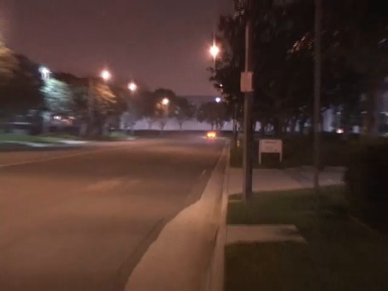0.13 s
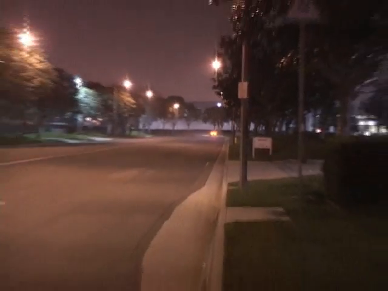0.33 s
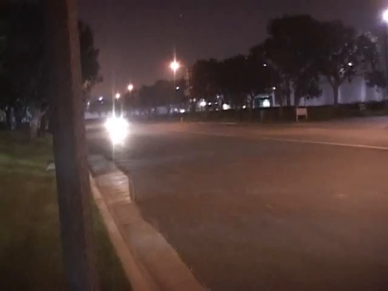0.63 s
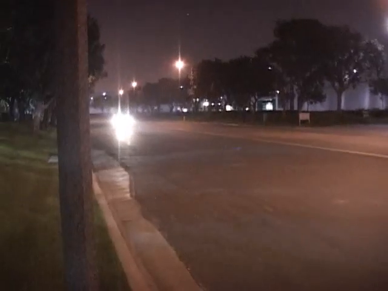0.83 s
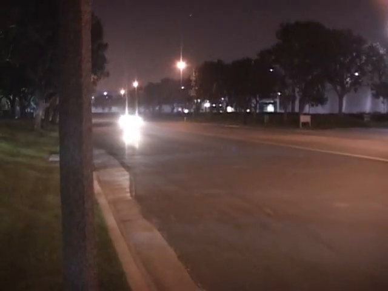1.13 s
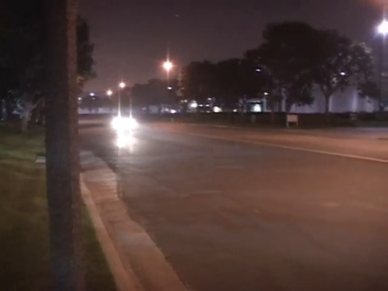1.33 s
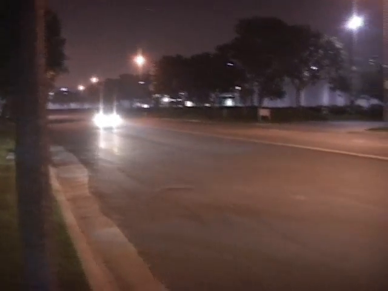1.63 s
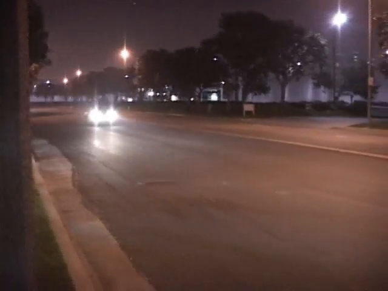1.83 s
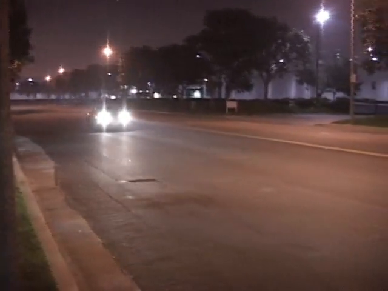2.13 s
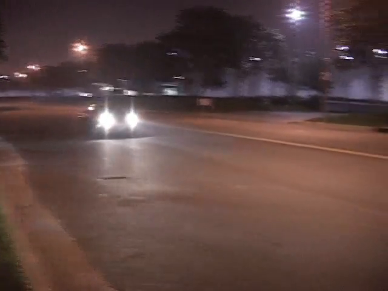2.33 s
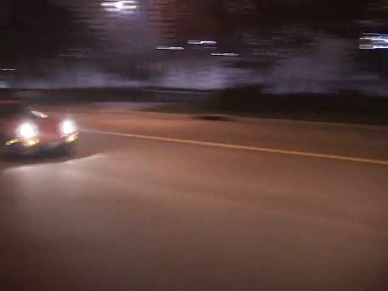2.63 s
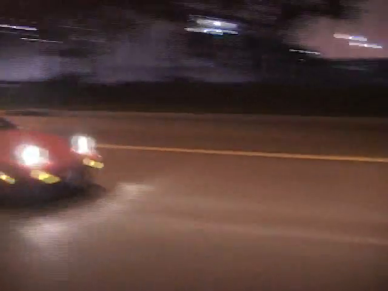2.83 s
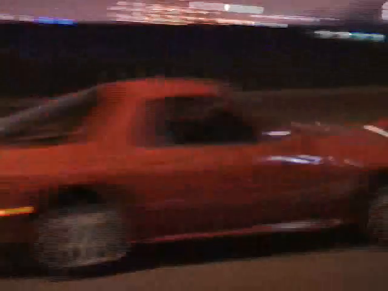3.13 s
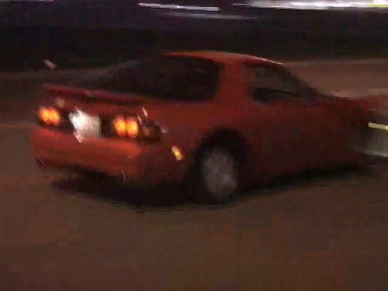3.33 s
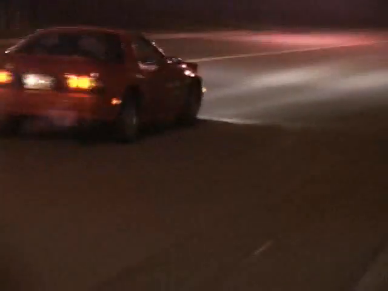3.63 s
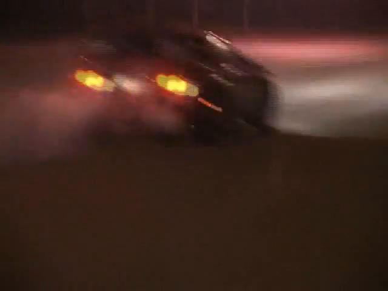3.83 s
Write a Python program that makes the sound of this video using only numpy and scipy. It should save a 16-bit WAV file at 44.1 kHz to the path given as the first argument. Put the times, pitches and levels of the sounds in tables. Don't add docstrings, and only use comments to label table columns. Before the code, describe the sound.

After a faint distant tyre rush, an abrupt cut brings a buzzing car engine swelling nearer; it coasts past close by in bright hiss, its exhaust banging and popping, distorting the small camera microphone, with street echo.

```python
import sys
import numpy as np
from scipy import signal
from scipy.fft import rfft, irfft, next_fast_len
from scipy.io import wavfile
from scipy.ndimage import uniform_filter1d, map_coordinates

SR = 44100
rng = np.random.default_rng(int(sys.argv[2]) if len(sys.argv) > 2 else 0)


def int16_out(signal):
    q = np.round(np.clip(np.atleast_2d(signal).T, -1, 1) * 32767)
    wavfile.write(sys.argv[1], SR, q.astype(np.int16))


def ratio(d):
    e = np.asarray(d, float) / 20
    return 10 ** e


N = 176400
T = np.arange(N) / SR
CUT_S, LIFT_S = 0.594, 2.575


def unit(x):
    return x / np.sqrt(np.mean(x ** 2) + 1e-20)


def along(points, hz):
    f, v = np.transpose(points)
    return np.interp(np.log(hz + 1), np.log(f + 1), v)


def curves(rows):
    s, *cols = np.transpose(rows)
    return [np.interp(T, s, c) for c in cols]


def ramp(from_s, to_s):
    return np.clip((T - from_s) / (to_s - from_s), 0, 1)


def fade_between(from_s, to_s, fade_s):
    return ramp(from_s - fade_s, from_s + fade_s) * (1 - ramp(to_s - fade_s, to_s + fade_s))


def wobble(rate):
    coarse = np.arange(0, N + 64, 64)
    knots = rng.standard_normal(int(N * rate / SR) + 4)
    return np.interp(np.arange(N), coarse, map_coordinates(knots, [coarse * rate / SR]))


def filtered(x, response):
    m = next_fast_len(N + SR // 2)
    return irfft(rfft(x, m) * response(np.fft.rfftfreq(m, 1 / SR)), m)[:N]


def equalised(x, points):
    return filtered(x, lambda hz: ratio(along(points, hz)))


def coloured(spectrum):
    return unit(equalised(rng.standard_normal(N), spectrum))


def above(x, cut_hz):
    return signal.sosfilt(signal.butter(3, cut_hz, "high", fs=SR, output="sos"), x)


# hz, level_db (per Hz)
DISTANT_RUSH = [(24, -60), (40, -26.5), (204, -4.5), (234, -15), (268, -10), (386, -11), (955, 3.5),
                (3640, -25), (9000, -42), (11700, -61), (19800, -120)]
# start_s, level_db
BUMPS = [
    (0.133, -49),
    (.163, -41),
]


def distant_car():
    drone_hz = 241 + 2.0 * wobble(5.1)
    drone = ratio(-53 + 1.5 + 0.87 * wobble(10.0)) * np.sin(2 * np.pi * np.cumsum(drone_hz) / SR)
    bumps = sum(ratio(db - 60 * np.clip(T - s, 0, 1) / 0.029) * (T > s) for s, db in BUMPS)
    return (ratio(-41 + 0.6 * wobble(24.5)) + bumps) * coloured(DISTANT_RUSH) + drone


# hz, level_db (per Hz)
HAND_RUMBLE = [(15, -10), (30, 0), (60, -6), (100, -20), (200, -60)]


def handling():
    settle_s = 1.4
    holding = 1 - ramp(settle_s - 0.2, settle_s + 0.2)
    return ratio(-67 + 2.5 * wobble(9)) * holding * coloured(HAND_RUMBLE)


# time_s, note_db, rasp_db
THROTTLE_LEVELS = [
    (.62, -24, -52),
    (.8, -23.5, -50),
    (1.2, -21, -44),
    (1.57, -19, -37.5),
    (2.0, -16, -35.5),
    (2.1, -14, -32.5),
    (2.25, -13, -32.5),
    (2.5, -7.5, -33),
    (2.56, -10.5, -28.5),
]
# order, level_db
ORDERS_FAR = [(1, -31), (2, -2), (3, -18.5), (4, -10), (5, -15.5), (6, -17), (7, -22), (8, -17), (9, -13.5),
              (10, -5.5), (11, -17), (12, -18.5), (13, -32), (14, -39)]
ORDERS_HALFWAY = [(1, -33), (2, -3.5), (3, -23), (4, -18.5), (5, -10.5), (6, -22), (7, -11), (8, -11),
                  (9, -11.5), (10, -7), (11, -16), (12, -16), (13, -42), (14, -44)]
ORDERS_CLOSE = [(1, -28.5), (2, -2), (3, -34), (4, -13), (5, -10), (6, -12), (7, -34), (8, -14.5), (9, -18),
                (10, -17.5), (11, -32), (12, -34), (13, -32), (14, -24.5)]
# order, level_db
ORDERS_COASTING = [(1, -4.5), (2, -3.5), (3, -2.5), (4, 2), (5, -6.5), (6, -5), (8, -3), (9, -4.5),
                   (10, -15)]
# hz, level_db
RASP_FAR = [(1700, -11), (2250, 8.5), (2600, -7), (2900, 9), (3400, -5), (4050, 6), (4600, 0), (6500, -5)]
RASP_CLOSE = [(1700, 14), (2100, 11.5), (2600, 6), (2850, 7), (3300, -10), (4050, -5), (5000, -17),
              (6500, -27)]
# order, start_s, end_s, level_db
SINGING_ORDERS = [(18, 1.15, 1.47, -42), (18, 1.8, 1.95, -33), (16, 2.05, 2.26, -36), (22, 2.1, 2.35, -36),
                  (14, 2.02, 2.23, -31), (32, 1.5, 2, -47), (33, 1.5, 1.5, -49), (30, 1.55, 1.56, -55),
                  (22, 1.55, 1.83, -43), (27, 2.4, 2.58, -34), (31, 1.7, 2.08, -43)]


def order_tone(turns, order, level_db):
    phase = order * turns - 1 / 4 + 0.45 * (rng.random() - 0.5)
    return np.sqrt(2) * ratio(level_db) * np.sin(2 * np.pi * phase)


def flutter(order):
    return 0.5 * np.sqrt(order / 4) * wobble(24.99)


def pulling_note(turns):
    nearer, near = ramp(0.85, 1.54), ramp(1.54, 2.22)
    total = 0
    for (k, far), (_, mid), (_, close) in zip(ORDERS_FAR, ORDERS_HALFWAY, ORDERS_CLOSE):
        level_db = far + nearer * (mid - far) + near * (close - mid)
        total = total + order_tone(turns, k, level_db + flutter(k))
    return total


def exhaust_rasp(turns, shaft_hz):
    knots = T[::64]
    turned = ramp(2.01, 2.07)[::64]
    knots_hz = np.interp(knots, T, shaft_hz)
    total = 0
    for k in range(15, 50):
        hz = k * knots_hz
        colour_db = np.interp(T, knots, (1 - turned) * along(RASP_FAR, hz) + turned * along(RASP_CLOSE, hz))
        fading_db = 3 * wobble(2.5) + 2.5 * wobble(25.1)
        odd_db = -4 * (k % 2)
        total = total + order_tone(turns, k, colour_db + fading_db + odd_db)
    return total


def singing_orders(turns):
    return sum(order_tone(turns, round(k), db - 1.5 + 3.3 * wobble(21.8)) * fade_between(a, b, 0.09)
               for k, a, b, db in SINGING_ORDERS)


def coasting_note(turns):
    shadow_db = -2 * (1 - ramp(3.2, 3.3))
    return sum(order_tone(turns, k, db + (k > 1) * shadow_db + 4.0 * flutter(k) + 1.4 * wobble(9))
               for k, db in ORDERS_COASTING)


def lingering_order(turns, shaft_hz):
    since = np.clip(T - LIFT_S, 0, None)
    level = ratio(-10.5 - 60 * since / 0.38) * ramp(LIFT_S - 0.03, LIFT_S)
    sag_turns = np.cumsum(0.85 * since * shaft_hz) / SR
    return level * np.sin(2 * np.pi * 5 * (turns - sag_turns))


def engine_note(turns, shaft_hz):
    throttle = ratio(-20 * np.clip(T - LIFT_S, 0, 1) / 0.015)
    note_db, rasp_db = curves(THROTTLE_LEVELS)
    coast_db = curves(ROAR_LEVELS)[2]
    pulling = ratio(note_db) * pulling_note(turns) + ratio(rasp_db - 13.5) * exhaust_rasp(turns, shaft_hz)
    driven = throttle * (singing_orders(turns) + pulling)
    coasting = ratio(coast_db) * (1 - throttle) * coasting_note(turns)
    return lingering_order(turns, shaft_hz) + driven + coasting


# time_s, roar_db, tilt_db_per_octave, coast_db
ROAR_LEVELS = [(.62, -29, -0.5, -34), (.77, -28, 0, -34), (1.36, -24, 1, -32), (2.03, -19.5, 0.5, -23),
               (2.2, -18, 0.5, -24), (2.45, -16, 1, -26), (2.65, -14, 0, -33.5), (2.85, -12, 0, -31),
               (3.05, -9.5, 0.5, -26), (3.25, -12, 2.5, -23), (3.4, -13, 1.5, -26.5), (3.6, -16, 0.5, -30),
               (3.79, -19, 1.5, -30.5), (4, -19, -2, -40.5)]
# hz, level_db (per Hz)
ROAR_SPECTRUM = [(50, -64), (110, -33), (200, -10), (400, -4), (650, -6), (1050, 0), (2200, -11.5),
                 (15500, -39.5)]
# hz, level_db
TAILPIPE_COLOUR = [(150, 1.5), (300, 0.5), (500, 1.5), (750, -0.5), (1100, 0.5), (1500, -2.5), (2000, 0),
                   (3000, 0.5)]


def roar(turns):
    level_db, tilt_db, _ = curves(ROAR_LEVELS)
    puffs = 1 + 0.1 * np.cos(4 * np.pi * turns) + 0.056 * np.cos(2 * np.pi * turns)
    hz, t, z = signal.stft(above(coloured(ROAR_SPECTRUM) * puffs, 68), SR, nperseg=512)
    patches = uniform_filter1d(rng.standard_normal(z.shape), 6, 0)
    patches = unit(uniform_filter1d(patches, 8, 1))
    tilt = tilt_db[np.minimum((t * SR).astype(int), N - 1)] * np.log2((hz[:, None] + 60) / 1200)
    facing = np.clip((t - 2.9) / (3.05 - 2.9), 0, 1)
    tilt = tilt + facing * along(TAILPIPE_COLOUR, hz)[:, None]
    shaped = signal.istft(z * ratio(tilt + 0.61 * patches), SR, nperseg=512)[1][:N]
    return ratio(level_db + 0.5 * wobble(9.24)) * shaped


# hz, level_db (per Hz)
HISS_SPECTRUM = [(1500, -30), (3000, -17), (4500, 6), (7000, -2.5), (15000, -15)]


def tyre_hiss():
    pass_s, width_s = 3.2, 0.23
    away = (T - pass_s) / width_s
    return ratio(-24 + 1.8 * wobble(29.69)) / (1 + away ** 2) * ramp(CUT_S, pass_s) * coloured(HISS_SPECTRUM)


# time_s, pitch_hz, level_db
WHISTLE = [
    (2.9, 13700, -66),
    (3.0, 13300, -36),
    (3.25, 12300, -31),
    (3.4, 12080, -62),
]


def whine():
    hz, db = curves(WHISTLE)
    silent = db <= min(WHISTLE[0][2], WHISTLE[-1][2])
    level = ratio(db + 1.3 * wobble(20) - 60 * silent)
    return level * np.sin(2 * np.pi * np.cumsum(hz + 65 * wobble(300)) / SR)


# start_s, ring_db, crack_db, push_db, length_s
BURNS = [(3.022, 1, -19, -40, 0.0026), (3.044, 4, -11, -36, 0.0036), (3.05, 4, -19, -35, 0.0037),
         (3.064, -14, -7, -40, 0.0052), (3.3109, 0.5, -4, -12, 0.0039), (3.3122, 3.5, 8.5, 4, 0.016),
         (3.4, -13, -27, -40, 0.0047), (3.435, -15, -15, -40, 0.0071), (3.517, -9.5, -36, -40, 0.007),
         (3.53, -10, -28, -40, .002), (3.5535, -13, -28, -31, 0.0011), (3.558, -2, 4.5, 2, .011),
         (3.5766, -1, -20, -12, 0.0031), (3.648, -17, -20, -40, .002), (3.703, -12.5, -18, -40, .001),
         (3.7611, -0.5, -11, -26, .001), (3.7681, 0.5, -19.5, -32, 0.0045), (3.7707, -1.5, -23, -22, .004),
         (3.7773, -4, -30, -30, .002), (3.978, -0.5, -11.5, -30, 0.0012), (3.985, 2, -22, -36, 0.0032),
         (3.9878, -1.5, -20, -30, 0.0024), (3.9944, -2.5, -22, -28, .002)]
# hz, width_hz, level_db
PIPE_RESONANCES = [(313, 200, -1), (492, 150, 7.5), (685, 130, 3.5), (1110, 1070, -3.5)]
# hz, level_db, t60_s
THUMP_MODES = [(461, -10.5, 0.051), (543.1, 0, 0.019), (334, -9.5, 0.024), (654, -10, 0.012),
               (1105, -12, 0.042)]
# hz, level_db (per Hz)
CRACK_SPECTRUM = [(500, 6), (2000, 4.5), (5000, -2.5), (15000, -16)]
# hz, level_db
STREET_COLOUR = [(300, 1.5), (1100, 0), (1600, -3), (8000, 0)]


def pipe_response(hz):
    return sum((-1) ** k * ratio(db) * 1j * hz * w / (c * c - hz * hz + 1j * hz * w)
               for k, (c, w, db) in enumerate(PIPE_RESONANCES))


def burn(since, hold, t60):
    return np.clip(since / 0.0029, 0, 1) * ratio(-60 * np.clip(since - hold, 0, 1) / t60)


def street_echo(bangs):
    t = np.arange(SR // 2) / SR
    tail = rng.standard_normal(len(t)) * ratio(-60 * t / 0.3) * (t > 0.01)
    return ratio(-15) * signal.fftconvolve(equalised(bangs, STREET_COLOUR), tail / np.linalg.norm(tail))[:N]


def backfire():
    u = np.arange(SR // 4) / SR
    late = 0.0041
    rattle = np.pad(unit(filtered(rng.standard_normal(N), pipe_response)), (0, SR))
    crack = np.pad(coloured(CRACK_SPECTRUM), (0, SR))
    thump = -sum(ratio(db - 60 * u / t60) * np.sin(2 * np.pi * hz * u) for hz, db, t60 in THUMP_MODES)
    bangs, push = np.zeros(N + SR), np.zeros(N + SR)
    for s, ring_db, crack_db, push_db, hold in BURNS:
        at = slice(round(s * SR), round(s * SR) + len(u))
        rough = ratio(-7) * min(hold / 0.012, 1) * burn(u - 0.002, hold, 0.065) * rattle[at]
        bangs[at] += ratio(ring_db) * (thump + rough)
        bangs[at] += ratio(crack_db) * burn(u - late, 0.69 * hold, 0.038) * crack[at]
        w = np.clip(u - late, 0, 1) / (0.57 * hold + 0.0018)
        push[at] -= ratio(push_db) * w * w * np.exp(2 - 2 * w)
    bangs = above(bangs[:N], 167)
    return bangs + push[:N] + street_echo(bangs)


# start_s, end_s, pitch_hz, level_db
PIPE_HOOTS = [(3.39, 3.425, 450, -22), (3.51, 3.525, 464, -15.5), (3.655, 3.715, 440, -17),
              (3.725, 3.76, 525, -16), (3.775, 3.84, 447, -14.5), (3.805, 3.84, 1000, -22.5),
              (3.86, 3.6, 990, -22.5), (3.92, 3.97, 450, -21), (3.982, 3.993, 621, -5),
              (3.772, 3.782, 1080, -8.5), (3.1, 3.15, 1090, -14.5), (3.06, 3.12, 940, -15.5),
              (3.435, 3.47, 1120, -13), (3.14, 3.3, 240, -25.5)]


def hoots():
    sway = ratio(2.2 * wobble(60)) * np.exp(0.6j * wobble(45))
    total = np.zeros(N)
    for a, b, hz, db in PIPE_HOOTS:
        sagging_hz = hz - 220 * hz / 1000 * (T - b)
        tone = np.real(sway * np.exp(2j * np.pi * sagging_hz * (T - a)))
        total += ratio(db + 2.5) * fade_between(a, b, 0.0054) * tone
    return total


# time_s, shaft_hz
SHAFT_SPEED = [
    (.6, 113.4),
    (.89, 117.8),
    (1.91, 126.8),
    (2.43, 131.8),
    (2.6, 132.6),
    (2.8, 130.9),
    (3.0, 124.4),
    (3.25, 116.1),
    (3.5, 110.8),
    (4, 107.1),
]


def scene():
    shaft_hz, = curves(SHAFT_SPEED)
    turns = np.cumsum(shaft_hz * (1 + 0.00074 * wobble(28.5))) / SR
    passing = handling() + engine_note(turns, shaft_hz) + roar(turns) + tyre_hiss()
    passing = passing + whine() + backfire() + hoots()
    return np.where(np.arange(N) < CUT_S * SR, distant_car(), passing)[None]


def band_limit(x):
    return signal.sosfilt(signal.butter(12, 15820, fs=SR, output="sos"), x)


# hz, level_db
MIC_COLOUR = [(2500, -0.5), (3500, -2.5), (4100, 0), (5200, -5), (6000, -1.5), (7000, -7.5), (8700, -7.5),
              (15000, -3)]


def mirror_image(x):
    carrier_hz = 44100 - 32000
    edge = filtered(x, lambda hz: (np.minimum(hz, 4040) / 1000) ** 0.98)
    folded = edge * np.cos(2 * np.pi * carrier_hz * np.arange(N) / SR)
    return ratio(-23.5) * filtered(folded, lambda hz: (hz / carrier_hz) ** 0.31)


def record(dry):
    x = equalised(dry[0], MIC_COLOUR)
    bounce = filtered(x, lambda hz: np.exp(-2j * np.pi * hz * 0.000446))
    x = x + 0.085 * (1 - ramp(2.24, 3.7)) * bounce
    top, knee = 1.04, 42
    x = x / (1 + np.abs(x / top) ** knee) ** (1 / knee)
    x = x + mirror_image(x) + ratio(-68) * rng.standard_normal(N)
    x = filtered(x, lambda hz: 1j * hz / (3.8 + 1j * hz) * (hz < 15800))
    return band_limit(np.clip(x, -1, 1)[None])


dry = scene()
out = record(dry)
int16_out(out)
```